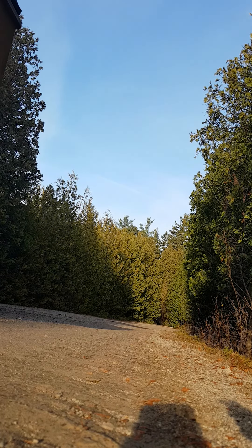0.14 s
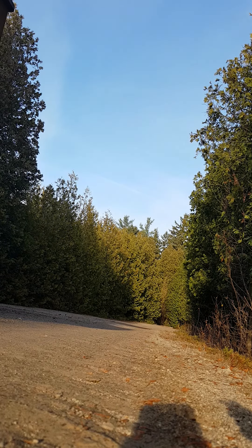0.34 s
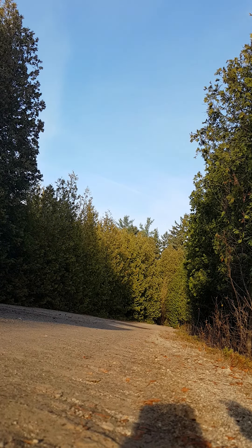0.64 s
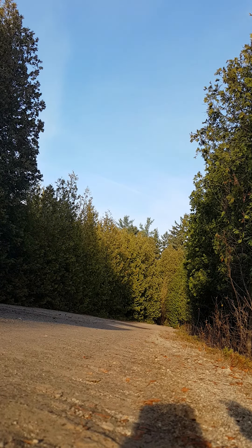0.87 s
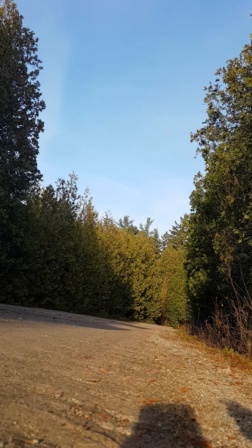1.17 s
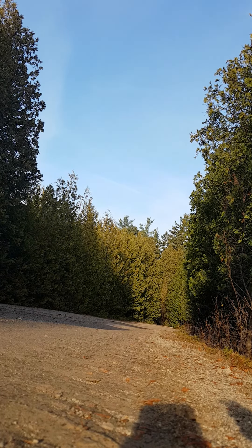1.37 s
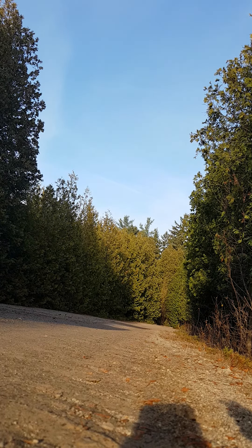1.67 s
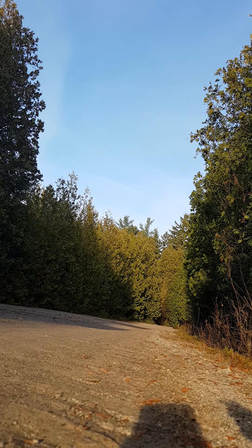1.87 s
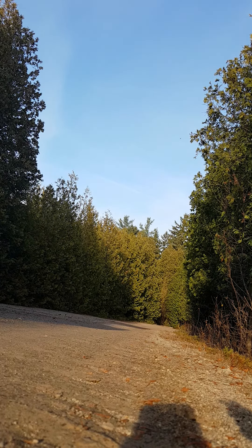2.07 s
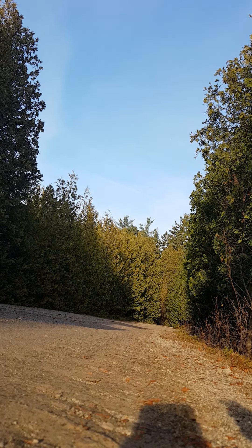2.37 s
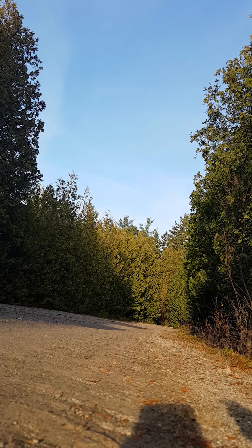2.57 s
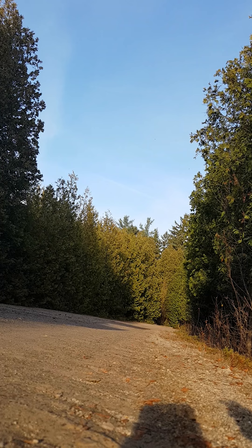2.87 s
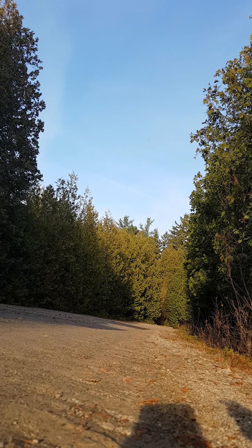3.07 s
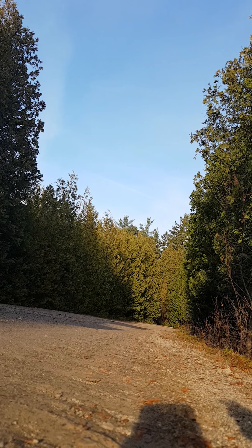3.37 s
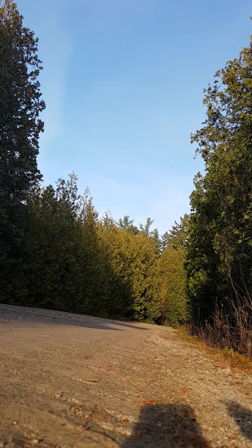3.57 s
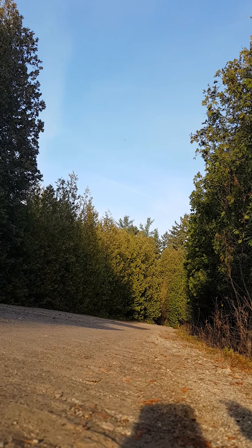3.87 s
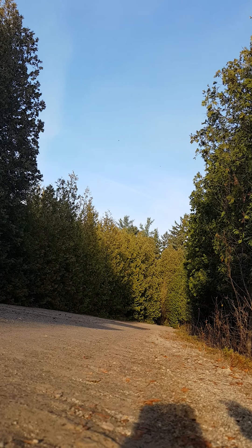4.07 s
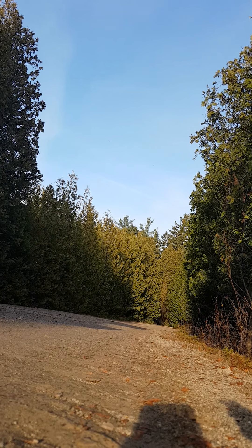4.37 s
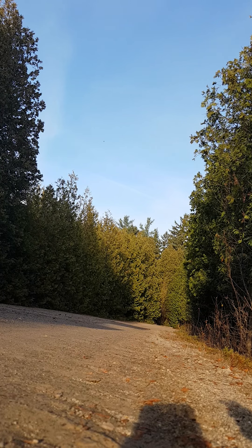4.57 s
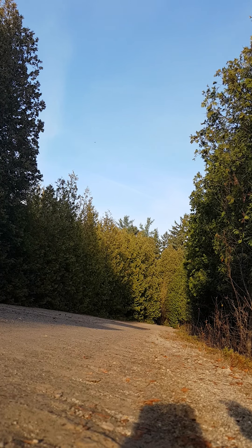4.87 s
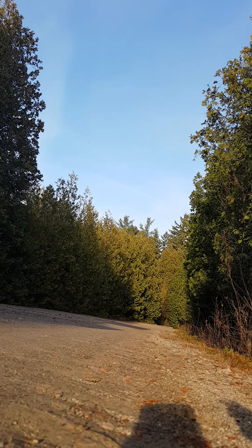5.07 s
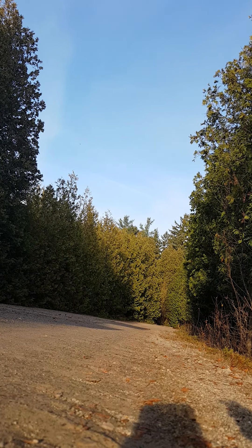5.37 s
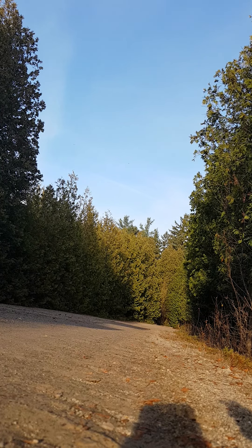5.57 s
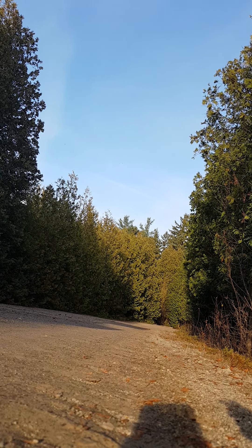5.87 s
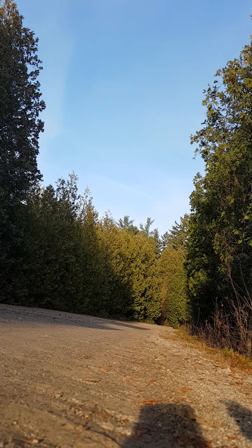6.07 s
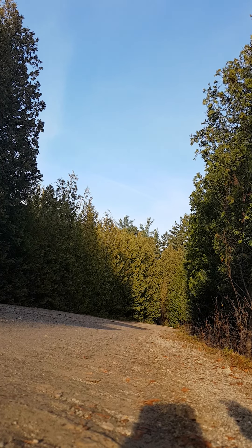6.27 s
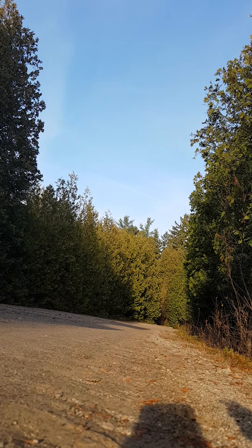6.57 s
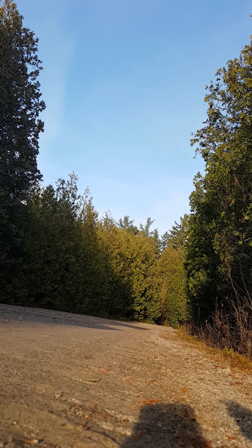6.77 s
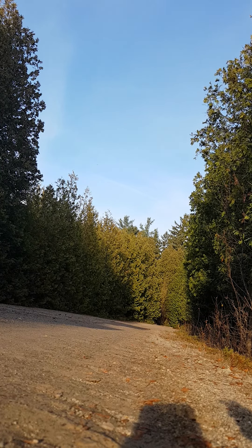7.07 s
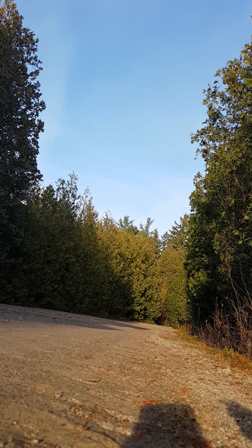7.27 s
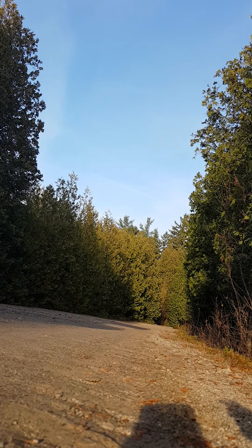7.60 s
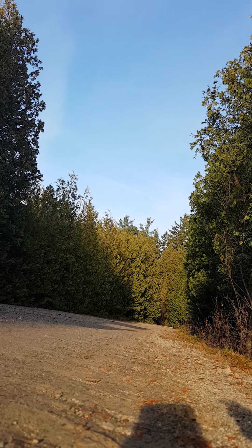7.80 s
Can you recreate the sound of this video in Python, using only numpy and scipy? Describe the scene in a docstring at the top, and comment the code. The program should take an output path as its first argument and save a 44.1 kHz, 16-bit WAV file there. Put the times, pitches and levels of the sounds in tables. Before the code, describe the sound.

A steam traction engine rolls away along a gravel lane, somewhat to the left. From the start, rods, gears and iron wheels knock several times a second in uneven, rattling flurries, over a heaving rumble, grinding gravel and soft steam hiss. Deep paired exhaust thumps and faint, high whistling leaks run until about 2.7 seconds, then stop. Loose iron clinks now and then and stones crack under the wheels, most sharply near 3.8 seconds. The knocks echo slightly among the trees and gradually weaken. Around 5.5 seconds the rumble drops away, leaving fainter, separate knocks and clicks over a steady low outdoor noise. Close to the microphone, gravel is scuffed briefly at about 7.1 and 7.3 seconds, each time with a small stony squeak. A sharp click and a louder, very short scuff follow around 7.5 seconds, and faint knocks continue until about 8 seconds.

```python
"""Traction engine on a gravel lane

Between trees, a steam traction engine rolls away, off to the left. Rods, gears and wheel strakes knock
in rattling flurries, leaks whistle, the exhaust thumps, loose iron clinks and stones crack under the
wheels. It fades into the distance, and gravel is scuffed close to the microphone. The two microphone
ports hear the engine alike in the bass; its treble reaches the left one half a millisecond sooner."""
import sys
import numpy as np
from scipy import signal
from scipy.fft import rfft, irfft, next_fast_len
from scipy.io import wavfile
from scipy.ndimage import uniform_filter1d, map_coordinates

SR = 44100
rng = np.random.default_rng(int(sys.argv[2]) if len(sys.argv) > 2 else 0)


def dump_mix(stems):
    """Bounce the given channels to the path in sys.argv[1] as a 16-bit WAV at rate SR."""
    frames = np.atleast_2d(stems).T  # one column per channel
    limited = np.clip(frames, -1, 1)  # hard clip at full scale
    pcm = np.round(limited * 32767).astype(np.int16)
    wavfile.write(sys.argv[1], SR, pcm)


N = 350154


def amp(db):
    return 10 ** (np.asarray(db) / 20)


def unit(x):
    return x / np.sqrt(np.mean(x ** 2) + 1e-20)


def along(points, hz):
    """Reads (f/Hz, value) points on a log frequency axis."""
    f, values = np.transpose(points)
    return np.interp(np.log(hz + 1), np.log(f + 1), values)


def filtered(x, response):
    """x through a complex frequency response."""
    n = x.shape[-1]
    size = next_fast_len(n + 4096)
    return irfft(rfft(x, size) * response(np.fft.rfftfreq(size, 1 / SR)), size)[..., :n]


def coloured(noise, spectrum):
    """Noise shaped by (f/Hz, level/dB) points, at unit RMS."""
    return unit(filtered(noise, lambda f: amp(along(spectrum, f))))


def resonance(hz, width):
    """A causal band-pass."""
    return lambda f: 1j * f * width / (hz * hz - f * f + 1j * f * width)


def contacts(n, spread_db, hold):
    """Noise whose strength jumps every hold samples: a run of uneven contacts, the first one hard."""
    steps = np.clip(rng.standard_normal(n // hold + 1), -2, 1.5)
    steps[0] = steps.max()
    return unit(amp(spread_db * np.repeat(steps, hold)[:n]) * rng.standard_normal(n))


def wobble(rate):
    """A smooth random curve, rate knots a second."""
    return map_coordinates(rng.standard_normal(int(N * rate / SR) + 4), [np.arange(N) * rate / SR])


def burst(shake, response, t60, rise, rattle_share=1):
    """Filtered shaking that rises and decays; after a tight first clunk, only a share rattles on."""
    t, clunk_s = np.arange(len(shake)) / SR, .026
    clunk = rattle_share + (1 - rattle_share) * np.exp(-(t / clunk_s) ** 4)
    envelope = amp(-60 * t / t60) * (1 - np.exp(-t / rise)) * clunk
    return unit(filtered(shake * envelope, response)) / unit(envelope).max()


def add(track, s, sound):
    """Lays a sound on a track at s seconds."""
    part = track[round(s * SR):][:len(sound)]
    part += sound[:len(part)]


# Background of the lane: f/Hz, level/dB
AIR_SPECTRUM = [(24, -19), (40, 8.5), (120, 14.5), (785, -24.5), (1170, -7), (2960, -20), (15800, -51.5)]
# Two steady bands in it: f/Hz, width/Hz, boost/dB
AIR_BANDS = [(1117, 48, 9), (2500, 310, 11)]
def lane_air():
    """Steady low noise all round the microphone, with two bell-shaped peaks higher up."""
    def colour(f):
        peaks_db = sum(db / (1 + (2 * (f - hz) / width) ** 2) for hz, width, db in AIR_BANDS)
        return amp(along(AIR_SPECTRUM, f) + peaks_db)
    return amp(-45) * unit(filtered(rng.standard_normal(N), colour))


# The engine drawing away down the lane: t/s, rumble/dB, grind/dB, steam/dB
ROLL_LEVELS = [(0.0, -30.5, -29, -45.5), (2.55, -34, -36.5, -48.5), (2.7, -33.5, -36, -53),
               (5.46, -44, -51.5, -58.5), (5.79, -68, -56, -60), (7.94, -60, -52.5, -56.5)]
# Spectra of wheel rumble, grinding and steam hiss: f/Hz, level/dB
RUMBLE_SPECTRUM = [(20, -27), (40, 3.5), (82, 9), (200, 10.5), (245, -16), (300, 5.5), (390, -63),
                   (660, -120)]
GRIND_SPECTRUM = [(59, -9), (100, -2.5), (500, -8), (822, -15.5), (1060, -16.5), (6000, -35.5),
                  (7800, -113)]
STEAM_SPECTRUM = [(1470, -1.5), (2500, -37), (2890, -4), (8260, -12), (9070, -15.5), (13100, -10.5),
                  (15800, -17.5)]
def rolling():
    """Iron wheels rumble and grind on the stones, and steam leaks; all of it heaves unevenly."""
    times, *levels = np.transpose(ROLL_LEVELS)
    rumble_db, grind_db, steam_db = [np.interp(np.arange(N) / SR, times, db) for db in levels]
    sway_db, heave_db, flutter_db = 2.5 * wobble(6), 2.5 * wobble(9), .55 * wobble(22)
    rumble = amp(rumble_db + sway_db) * coloured(rng.standard_normal(N), RUMBLE_SPECTRUM)
    grind = amp(grind_db + heave_db) * coloured(contacts(N, spread_db=1.5, hold=200), GRIND_SPECTRUM)
    steam = amp(steam_db + heave_db / 4 + flutter_db) * coloured(rng.standard_normal(N), STEAM_SPECTRUM)
    return rumble + grind + steam


# Whistling leaks on the engine: f/Hz, width/Hz, level/dB, waver/dB
LEAKS = [(3800, 40, -66, 4), (4200, 120, -63, 4), (5380, 30, -66, 6), (8420, 100, -67, 2),
         (13250, 300, -62, 1.5)]
def steam_whistles(shut_s=2.64, fall_s=.03):
    """Narrow bands of steam noise, each wavering on its own, until the leaks close."""
    out = np.zeros(N)
    for hz, width, db, waver_db in LEAKS:
        gain = amp(db + waver_db * wobble(8.4))
        out += gain * unit(filtered(rng.standard_normal(N), lambda f: resonance(hz, width)(f) ** 2))
    return out * np.clip((shut_s - np.arange(N) / SR) / fall_s + 1, 0, 1)


# Modes of the engine's frame: f/Hz, width/Hz
FRAME_MODES = [(85, 15), (128, 47), (170, 29), (250, 45), (332, 9.8), (430, 310), (540, 204), (620, 135),
               (760, 810), (930, 99)]
# Rods, gears and wheel strakes, fainter with distance: t/s, level/dB, body f/Hz, clack re body/dB
KNOCK_BLOWS = [(0.004, -20.5, 302, -7.5), (0.163, -16.5, 227, -14.5), (0.207, -16, 203, -15.5),
               (0.261, -27.5, 315, -11), (0.39, -33.5, 213, 0.5), (0.458, -20, 162, -30),
               (0.538, -22, 223, -5), (0.653, -24, 230, -11), (0.717, -15, 340, -12.5),
               (0.788, -16.5, 173, -23), (0.878, -14.5, 316, -15), (1.005, -21, 237, -16),
               (1.05, -15.5, 217, -15), (1.224, -14, 249, -14), (1.397, -15, 165, -15.5),
               (1.576, -18, 280, -9.5), (1.68, -20, 132, -26), (1.75, -23.5, 225, -18),
               (1.921, -22.5, 208, -13), (2.027, -20.5, 190, -11.5), (2.1, -13.5, 240, -11.5),
               (2.207, -14, 630, -9.5), (2.282, -16, 260, -13), (2.329, -20, 150, -45),
               (2.468, -24, 235, -10), (2.631, -10.5, 292, -23.5), (2.689, -27, 170, -16),
               (2.816, -19.5, 267, -21), (2.996, -21.5, 246, -11.5), (3.086, -27.5, 265, -10),
               (3.12, -11, 244, -21), (3.317, -15.5, 93, -31), (3.318, -17.5, 298, -17),
               (3.436, -21.5, 322, -7), (3.68, -17.5, 188, -19), (3.714, -21, 200, -8.5),
               (3.748, -23, 252, -12), (3.819, -24.5, 374, -3.5), (3.851, -20, 376, -2.5),
               (3.894, -19, 317, -14), (3.943, -19.5, 93, -35), (3.948, -23.5, 420, -12.5),
               (4.135, -35, 322, -5.5), (4.299, -23.5, 280, -15), (4.552, -22.5, 574, -7.5),
               (4.583, -21.5, 298, 1.5), (4.651, -17.5, 310, -5), (4.84, -21.5, 212, -9.5),
               (4.898, -21.5, 308, -8), (5.207, -23.5, 540, -17), (5.277, -22, 233, -17),
               (5.337, -26.5, 230, -9.5), (5.514, -33.5, 207, -21), (5.753, -41, 205, -31),
               (6.093, -36.5, 150, -10), (6.312, -32.5, 142, -23), (6.339, -29.5, 149, -16),
               (6.366, -23.5, 159, -21.5), (6.486, -28.5, 150, -18.5), (6.744, -28, 229, -6),
               (6.888, -33.5, 244, -16.5), (6.939, -30, 165, -16.5), (7.067, -27.5, 310, -14),
               (7.209, -34, 236, -16.5), (7.458, -25.5, 242, -7), (7.524, -32, 237, -4),
               (7.559, -20, 260, -14), (7.724, -38, 208, -26), (7.869, -37.5, 156, -34)]
def knocks():
    """Each blow shakes a flurry of contacts through the frame modes, with a clack and a ground thud."""
    out = np.zeros(N)
    for s, db, hz, clack_db in KNOCK_BLOWS:
        t60 = 0.4 * np.cbrt(250 / hz) * np.exp(.2 * rng.standard_normal())  # small parts settle sooner
        shake = contacts(8192, spread_db=1.5, hold=90)
        shake[rng.integers(100, 260)] += 19  # the hardest contact comes a little into the flurry
        frame_gains = amp(rng.normal(0, 5.5, len(FRAME_MODES)))
        detune = rng.normal(1, .03)  # each part rings a little apart
        iron_gains = amp(rng.normal(0, 4, len(IRON_MODES)))

        def frame(f):
            modes = sum(g * resonance(c * detune, w)(f) for g, (c, w) in zip(frame_gains, FRAME_MODES))
            return resonance(hz, 1.3 * hz)(f) ** 3 * (0.025 + modes)

        def loose_iron(f):
            modes = sum(g * resonance(c, .07 * c)(f) for g, (c, *_) in zip(iron_gains, IRON_MODES))
            return resonance(1150, 1500)(f) ** 4 * (.5 + modes)

        body = burst(shake, frame, t60, rise=0.0035, rattle_share=.4)
        clack = burst(shake, loose_iron, 0.78 * t60, rise=0.0011, rattle_share=.4)
        thud = burst(shake, lambda f: resonance(88, 70)(f) ** 3, 0.43 * t60, rise=0.015)
        thud_db = -6.5 - 3.45 * np.log2(hz / 250)  # deeper blows shake the ground more
        add(out, s, amp(db) * (body + amp(clack_db) * clack + amp(thud_db) * thud))
    return out


def exhaust_thumps(first_s=0.15, turn_s=0.56, return_s=0.33, t60=0.1):
    """Two deep thumps to a turn of the crank, each sinking in pitch, until the steam is shut off."""
    out, t = np.zeros(N), np.arange(SR // 4) / SR
    hz = 25.9 + 45.4 * np.exp(-t / 0.038)
    cycles = np.cumsum(hz) / SR
    thump = np.sin(2 * np.pi * cycles) * amp(-60 * t / t60) * (1 - np.exp(-t / 0.017))
    for stroke in range(10):
        s = first_s + turn_s * (stroke // 2) + return_s * (stroke % 2)
        add(out, s, amp(rng.normal(-20.5, 0.74)) * thump / thump.max())
    return out


def crack(hz, t60):
    """A hard contact: a sudden broad burst of noise centred on hz."""
    colour = lambda f: resonance(hz, 1.1 * hz)(f) ** 2 * resonance(hz, 3 * hz)(f)
    shake = contacts(SR // 6, spread_db=3.5, hold=30)
    return burst(shake, colour, t60, rise=0.000053)


# Modes of the loose iron, which also colour the knocks: f/Hz, level/dB, t60/s
IRON_MODES = [ (1250, -1, .07), (1720, -1, .075), (2520, -3, .06), (3300, -4, .07), (4000, -3, .05),
              (6370, -1, .06)]
# Loose iron struck on the engine: t/s, level/dB, centre f/Hz
CLINK_HITS = [(0.206, -27, 1950), (0.385, -43.5, 1600), (3.485, -52, 3870), (3.706, -42, 4700),
              (4.301, -55, 6360), (4.509, -63, 4000), (4.575, -34.5, 1940), (5.209, -36, 1170),
              (5.561, -65, 4000), (5.177, -47, 2200), (5.291, -32, 1710)]
def clinks(ring_db=18):
    """A crack, and the iron modes nearest to it ringing on as the part chatters against its seat."""
    n = SR // 6
    out, t = np.zeros(N), np.arange(n) / SR
    for s, db, hz in CLINK_HITS:
        ring = np.zeros(n)
        for mode_hz, mode_db, t60 in IRON_MODES:
            struck_db = rng.normal(mode_db, 1.5) - 21 * abs(np.log2(mode_hz / hz))
            ring += amp(struck_db - 60 * t / t60) * np.sin(2 * np.pi * mode_hz * t)
        chatter_db = 4.5 * np.interp(np.arange(n) / 350, np.arange(n), rng.standard_normal(n))
        ring *= amp(ring_db + chatter_db) * (1 - np.exp(-t / 0.00063))
        add(out, s, amp(db) * (crack(hz, t60=0.16) + ring))
    return out


# Stones in the lane, crushed under the wheels or kicked: t/s, level/dB, centre f/Hz, t60/s
STONE_CRACKS = [(1.015, -26, 2250, 0.018), (1.343, -40.5, 2800, 0.21), (1.439, -37, 3360, 0.05),
                (2.365, -34, 2320, 0.13), (2.465, -34, 4400, 0.057), (2.856, -45, 3460, 0.085),
                (3.198, -34, 2100, 0.18), (3.368, -33, 2900, 0.1), (3.849, -17, 3770, 0.085),
                (3.85, -46, 12000, 0.1), (4.297, -35.5, 2770, 0.11), (4.648, -44.5, 9400, 0.12),
                (4.9, -40, 2120, 0.29), (5.337, -48.5, 12000, 0.1), (5.345, -43, 2780, 0.16),
                (6.131, -34.5, 755, 0.038), (6.3, -38, 990, 0.11), (6.718, -46, 9000, .015),
                (6.741, -40.5, 2130, 0.17), (7.46, -20, 2060, 0.0069), (7.524, -38, 2250, 0.21),
                (7.6, -39.5, 2400, 0.32), (7.629, -39, 3500, .02), (7.676, -39.5, 1450, .04)]
def stones():
    """Each stone is a bare crack, with no ring."""
    out = np.zeros(N)
    for s, db, hz, t60 in STONE_CRACKS:
        add(out, s, amp(db) * crack(hz, t60))
    return out


# Spectrum of sliding gravel: f/Hz, level/dB
GRAVEL_SPECTRUM = [(150, -48), (350, -7.5), (1100, -11.5), (3300, -15.5), (6000, -24.5), (9300, -38.5),
                   (12000, -27.5), (15800, -38)]
# Scuffs close to the microphone: t/s, length/s, level/dB
GRAVEL_SCUFFS = [(7.062, 0.091, -33.5), (7.273, 0.034, -32), (7.557, 0.018, -16.5)]
def scuffs(t60=.075):
    """Dense grains of gravel sliding for a moment, with a quick start and a short fall."""
    envelope, t = np.zeros(N), np.arange(SR // 4) / SR
    for s, length, db in GRAVEL_SCUFFS:
        fall_db = 60 * np.maximum(t - length, 0) / t60
        add(envelope, s, amp(db - fall_db) * (1 - np.exp(-t / 0.0059)))
    return envelope * coloured(contacts(N, spread_db=2.5, hold=40), GRAVEL_SPECTRUM)


# Stick-slip within those close scuffs: t/s, length/s, start f/Hz, end f/Hz, level/dB
STONE_SQUEAKS = [(7.08, .085, 1040, 1110, -34), (7.274, .03, 980, 860, -27)]
def squeaks():
    """A stone slipping and sticking at an uneven rate: a short gliding stack of overtones."""
    out = np.zeros(N)
    for s, length, from_hz, to_hz, db in STONE_SQUEAKS:
        n = round(length * SR)
        jitter = .1 * uniform_filter1d(rng.standard_normal(n), size=60)
        slip_hz = np.linspace(from_hz, to_hz, n) * (1 + jitter)
        cycles = np.cumsum(slip_hz) / SR
        overtones = sum(np.sin(2 * np.pi * k * cycles) / k for k in range(1, 9))
        add(out, s, amp(db) * overtones * np.sqrt(np.hanning(n)))
    return out


# Decay among the trees along the lane: f/Hz, t60/s
TREE_DECAY = [(100, 0.092), (1000, 0.33), (8000, 0.19)]
def tree_echoes(x):
    """Scattered echoes off the trees, 16 ms late, each frequency dying at its own speed."""
    hz, t, spectra = signal.stft(rng.standard_normal(SR // 2), SR, nperseg=256)
    decay = amp(-60 * t / along(TREE_DECAY, hz)[:, None])
    tail = signal.istft(spectra * decay, SR, nperseg=256)[1]
    return signal.fftconvolve(np.pad(x, (700, 0)), tail / np.linalg.norm(tail))[:N]


# Left port ahead of the right, before scaling by lead: f/Hz, phase/rad
PORT_PHASE = [(0, 0), (600, -0.59), (1460, 4.5), (16000, 61.5)]
# How alike the two ports sound: f/Hz, likeness/0-1
PORT_LIKENESS = [(60, 0.97), (300, 0.98), (700, 0.83), (1400, 0.51), (5000, 0.38), (12000, 0.12)]
# Balance of the ports: f/Hz, left minus right/dB
PORT_BALANCE = [(60, -1), (240, -1.5), (950, -5.5), (3770, -2), (15000, 4)]
def microphone_ports(x, lead):
    """Both ports: a shared sound, a scattered part of opposite sign, a level tilt and a time lead."""
    spectra = signal.stft(x, nperseg=128)[2]
    steps = unit(uniform_filter1d(rng.standard_normal(spectra.shape), size=4, axis=0))
    drift_rad = .35 * np.cumsum(steps, axis=1)  # the scattered sound wanders in phase
    scattered = unit(signal.istft(spectra * np.exp(1j * drift_rad), nperseg=128)[1][:N]) * x.std()
    sign = np.array([[1], [-1]])  # left, right

    def blend(f):
        return np.arccos(np.clip(along(PORT_LIKENESS, f), 0, 1)) / 2

    def port(f):
        phase = lead * np.interp(f, *np.transpose(PORT_PHASE))
        return amp(sign * along(PORT_BALANCE, f) / 2) * np.exp(.5j * sign * phase)

    shared = filtered(x, lambda f: np.cos(blend(f)) * port(f))
    return shared + filtered(scattered, lambda f: sign * np.sin(blend(f)) * port(f))


def scene():
    """From the lane: the engine off to the left, the scuffed gravel close by and nearly central."""
    impacts = knocks() + clinks() + stones()
    air = lane_air()
    engine = impacts + amp(-10) * tree_echoes(impacts) + rolling() + steam_whistles() + exhaust_thumps()
    far = amp(-0.5) * microphone_ports(engine + air, lead=0.796)
    near = microphone_ports(scuffs() + squeaks(), lead=0.1)
    return far + near


def record(dry, top_hz=15900):
    """The recorder keeps nothing above its band limit."""
    return filtered(dry, lambda f: f < top_hz)


dry = scene()
out = record(dry)
dump_mix(out)
```